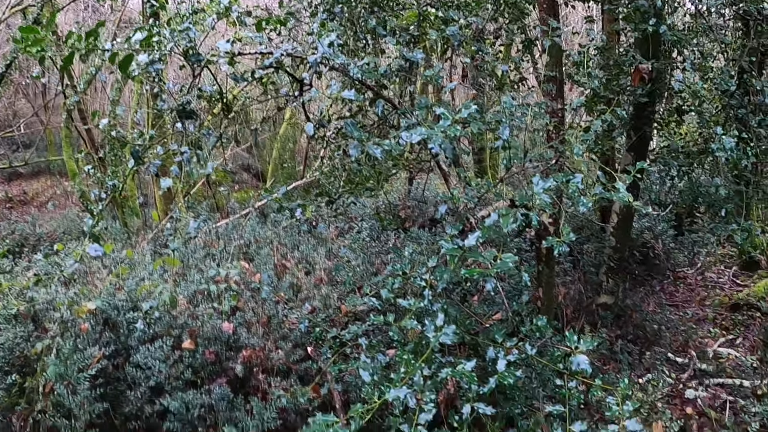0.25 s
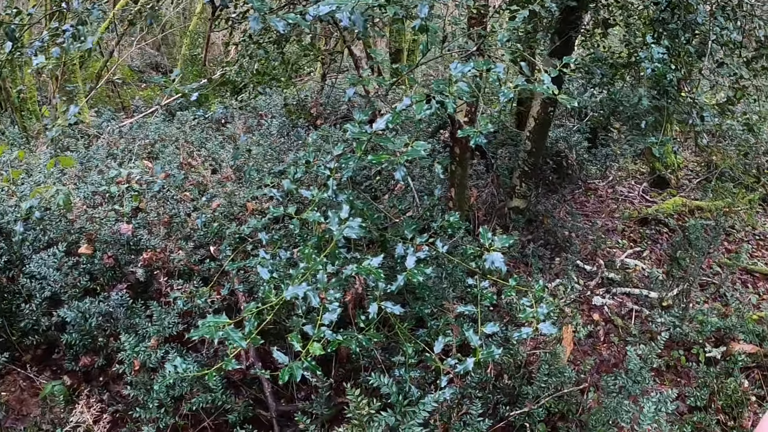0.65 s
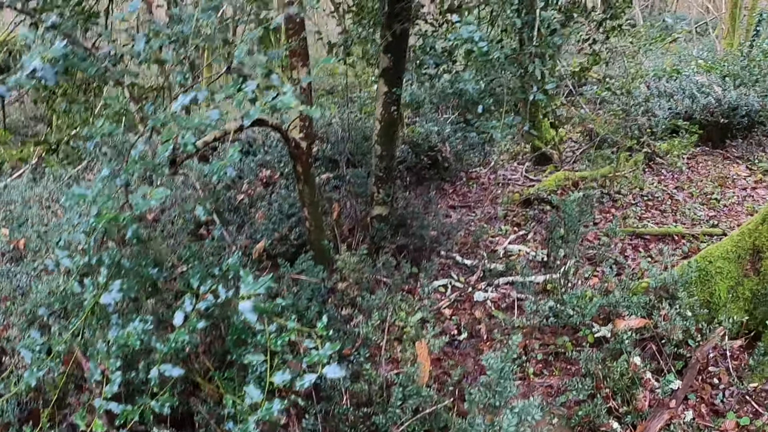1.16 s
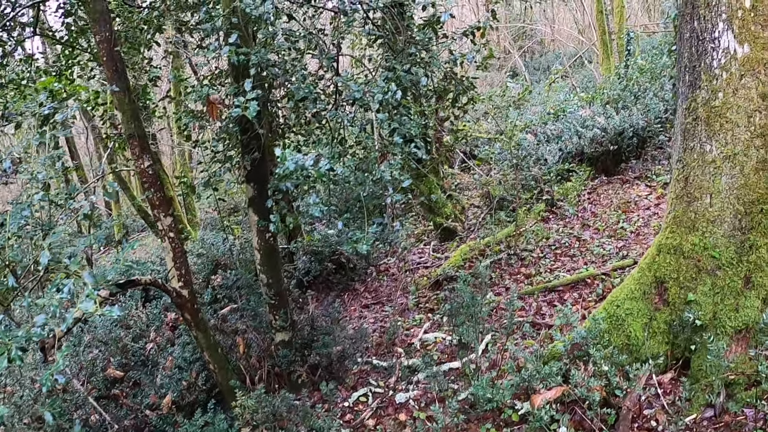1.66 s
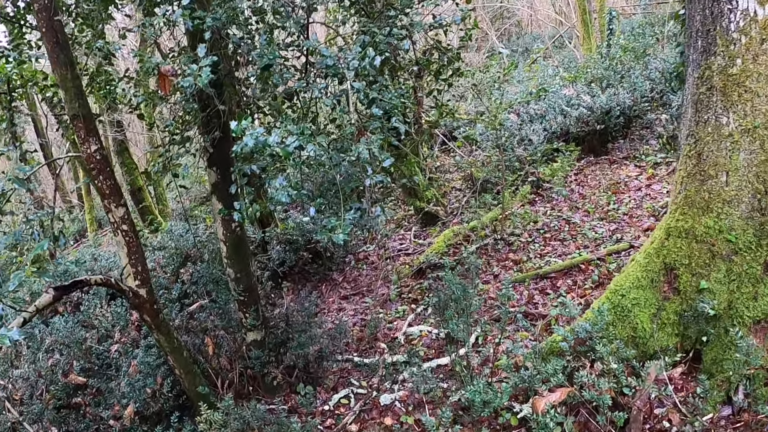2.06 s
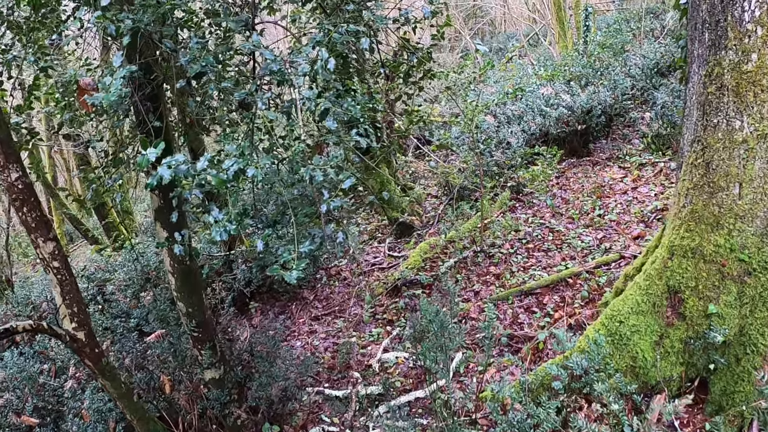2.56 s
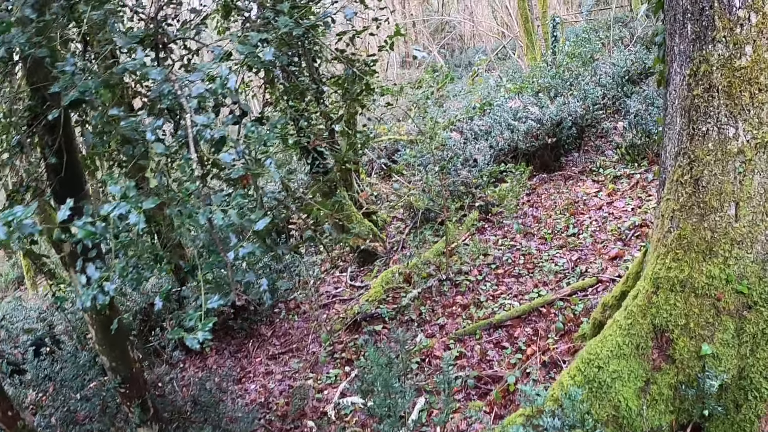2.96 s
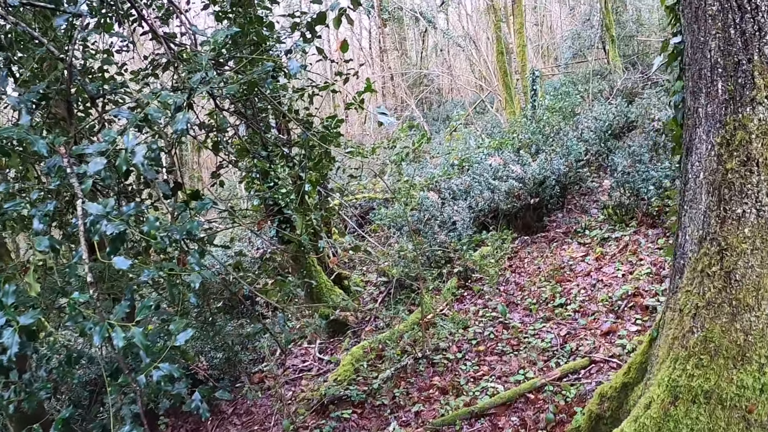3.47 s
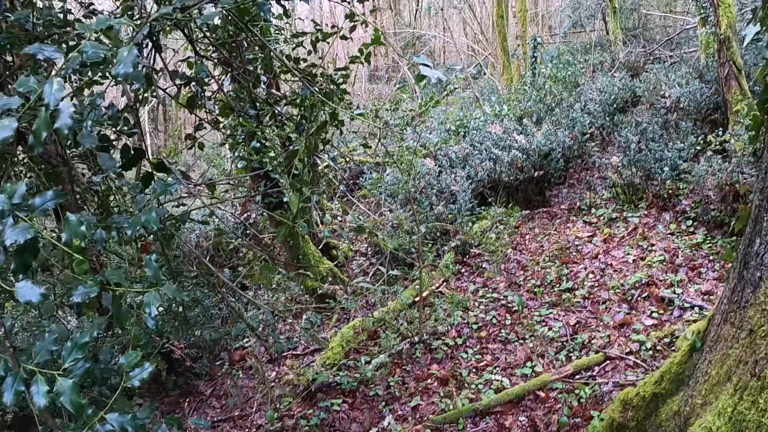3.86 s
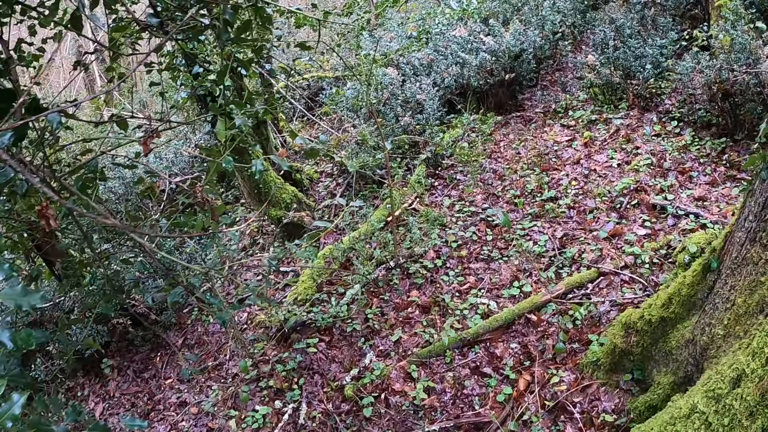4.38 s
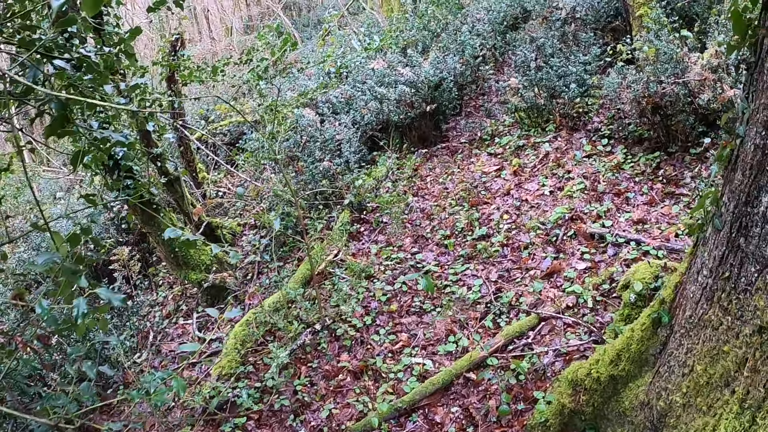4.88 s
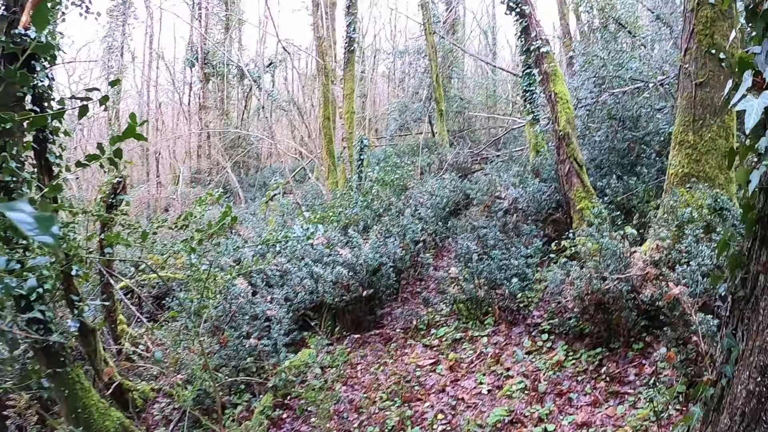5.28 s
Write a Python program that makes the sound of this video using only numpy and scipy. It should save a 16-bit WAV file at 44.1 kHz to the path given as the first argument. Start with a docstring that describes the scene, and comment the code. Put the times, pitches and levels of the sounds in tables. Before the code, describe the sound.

A dog wearing a small sheet-metal bell trots unseen through woodland brush. The bell gives short, hollow, slightly dull clanks near 1.3 kHz, with thin metallic overtones, a tick and a brief noisy clash, in uneven bursts of roughly ten or more strikes a second. From 0 to 1.2 s they are modest and clearly left, with one stronger clink at 0.2 s and light leaf crackle and twig ticks. Between about 1.25 and 1.65 s a heavy low wind buffet thuds and flutters on the microphones. From 1.65 s clanks grow denser and louder, drifting towards centre; a sharp twig snap comes at 2.7 s, and strong strikes with crunching leaves around 3.1 s. Loud separate clanks follow at 4.15 and 4.6 s, slightly right by 4.8 s, then back left by 5.2 s, with high twig snaps near 5.4 s. Small wind puffs, short tree echoes and steady soft hush throughout; it stops mid-action at 5.5 s.

```python
"""Dog bell in the brush

A dog with a small sheet-metal bell on its collar trots through woodland brush, from left to right and back.
The clapper strikes unevenly and sets off ringing modes, a noisy clash and a tick; trees echo them.
Leaves rustle as crackling noise and twigs snap as short damped tones. Wind buffets the two microphone
ports as slow noise swings, over a steady hush of filtered noise."""
import sys
import numpy as np
from scipy import signal
from scipy.io import wavfile
from scipy.ndimage import uniform_filter1d, map_coordinates

SR = 44100
rng = np.random.default_rng(int(sys.argv[2]) if len(sys.argv) > 2 else 0)


def output_pcm(signal):
    """Save a mono or channel-first signal as 16-bit PCM at the path in sys.argv[1].

    Samples are clipped to [-1, 1] before scaling.
    """
    pcm = np.clip(np.atleast_2d(signal).T, -1, 1) * 32767
    wavfile.write(sys.argv[1], SR, np.round(pcm).astype(np.int16))


N = 243954  # length in samples

# Where the dog is heard. Each row: time in seconds, left level over right level in dB (for the bell's hum).
PATH = [(0, 11), (.5, 12.5), (1.3, 8), (2.1, 4), (2.6, 4.5), (3.1, 0), (4.1, 0), (4.85, -3), (5.2, 4),
        (5.53, 4)]


def amp(db):
    """Turns decibels into a gain."""
    return 10 ** (np.asarray(db) / 20)


def evened(x):
    """Scales a signal to an rms (average strength) of 1."""
    return x / np.sqrt(np.mean(x ** 2) + 1e-20)


def read(points, hz):
    """Reads a table of (Hz, value) between its points, on a log-frequency axis."""
    f, value = np.transpose(points)
    return np.interp(np.log(hz + 1), np.log(f + 1), value)


def curves(rows):
    """Draws each column of a time table as a curve with a value at every sample."""
    s, *columns = np.transpose(rows)
    return [np.interp(np.arange(N) / SR, s, column) for column in columns]


def add(mix, s, sound):
    """Mixes a sound in at time s."""
    part = mix[..., max(round(s * SR), 0):][..., :sound.shape[-1]]
    part += sound[..., :part.shape[-1]]


def panned(pan_db):
    """Gives the left and right gains; a positive balance is louder on the left."""
    return amp(np.array([pan_db / 2, -pan_db / 2]))


def band(x, lo_hz, hi_hz):
    """Keeps the range between two frequencies."""
    return signal.sosfilt(signal.butter(2, [lo_hz, hi_hz], "band", fs=SR, output="sos"), x)


def swell(s, length, rise):
    """Gain that climbs to 1 at time s and dies away, in straight lines in dB."""
    edge_db = 14  # how far down both ends of the length lie
    t = np.arange(N) / SR - s
    rise = np.clip(rise, .05, .95)  # share of the length spent rising
    away = np.where(t < 0, -t / rise, t / (1 - rise))
    return amp(-edge_db * away / max(length, .01))


def hiss(spectrum, patchy_db, size=512):
    """Stereo noise shaped by a spectrum table, with patches of loudness that drift in time and pitch."""
    # How alike left and right are. Each row: frequency in Hz, likeness from 0 to 1.
    likeness = [(100, .2), (300, 0.87), (700, 0.97), (2000, 0.55), (5000, 0.088), (10000, 0.067)]
    frames, hz = 4 * N // size + 5, np.fft.rfftfreq(size, 1 / SR)
    a, b, c, d, patches = rng.standard_normal((frames, len(hz), 5)).T
    patches = uniform_filter1d(patches, size=6, axis=0)
    patches = evened(uniform_filter1d(patches, size=10, axis=1))
    same = np.clip(read(likeness, hz), -1, 1)[:, None]
    left = a + 1j * b
    right = same * left + np.sqrt(1 - same ** 2) * (c + 1j * d)
    both = np.array([left, right]) * amp(read(spectrum, hz)[:, None] + patchy_db * patches)
    return signal.istft(both, nperseg=size, noverlap=3 * size // 4)[1][:, :N]


def air():
    """The steady hush of the wood: soft noise with a fixed spectrum."""
    # Tone color of the hush. Each row: frequency in Hz, relative level in dB per Hz.
    hush_color = [(20, 8), (50, -10), (100, -41), (160, 2), (250, 7.5), (500, 6.5), (800, -8), (2000, 2.5),
                  (4000, 1), (6000, 5), (10000, -37), (13000, -36), (15500, -41)]
    hush = hiss(hush_color, patchy_db=-0.5, size=1024)
    return amp(-67.5) * hush / np.std(band(hush, 1500, 2600))  # the level is set in this band


def wind():
    """Lumpy pressure swings, mostly unrelated at the two ports; stronger gusts swing faster."""
    # One long gust. Each row: time in seconds, level in dB, flutter level above that in dB,
    # left level over right level in dB.
    gust = [(1.0, -70, 2, -2), (1.14, -59, -24, 5), (1.19, -33, -33, 4), (1.24, -52, -23, -1),
            (1.255, -42, -12, 12), (1.27, -12.5, -9, 1.5), (1.32, -27.5, -0.5, 0), (1.43, -26.5, -5, -5.5),
            (1.54, -24.5, -39, 8), (1.62, -33.5, -32, -8.5), (1.77, -63, -19, -12), (1.9, -90, -12, 0)]
    # Short puffs. Each row: time of the peak in seconds, length in seconds, level in dB,
    # flutter level above that in dB, left level over right level in dB.
    short_puffs = [(0.053, 0.083, -74, 5, -1), (0.512, 0.085, -79, -1.5, 3), (0.651, 0.098, -85, -2, -5),
                   (2.02, .3, -59.5, -1, 0), (2.337, 0.15, -59, -18, 1), (2.69, .12, -71, -8, -13),
                   (2.914, 0.092, -54, -13, 1.5), (3.086, 0.12, -51, 1, -1), (3.195, .1, -60, -8, 6),
                   (3.279, 0.092, -36, -24, 6), (3.665, .3, -56.5, -8.5, -5), (3.93, 0.13, -63, -24, -3),
                   (4.056, 0.58, -62, -17, 1), (4.662, 0.15, -41.5, -10, -0.5),
                   (4.824, 0.034, -46, -25, 1.5), (4.93, 0.086, -52, -19, 1.5), (5.224, 0.23, -50, -9, -3),
                   (5.44, 0.069, -53, -24, -3), (5.53, 0.093, -61, 2, -7)]
    puff_rise = 0.58  # share of the length spent rising
    quick_share = 0.29  # of the strongest gusts' power in the quicker swings, before they are flattened
    calm_flutter_db = -73  # the air is never quite still

    level_db, flutter_db, pan_db = curves(gust)
    level = amp(level_db) * panned(pan_db)
    fast = level * amp(flutter_db)
    for s, length, db, fast_db, side_db in short_puffs:
        puff = amp(db) * panned(side_db)[:, None] * swell(s, length, puff_rise)
        level, fast = level + puff, fast + puff * amp(fast_db)

    raw = rng.standard_normal((3, N))
    raw = raw[:2] + 0.39 * raw[2]  # the third noise is common to both ports
    lumps = amp(6.4 * evened(band(rng.standard_normal(N), 15.4, 39.6)))
    strong = np.clip((20 * np.log10(level.mean(0)) + 63) / 18, 0, 1)  # 0 in a calm, 1 in a strong gust
    slow = evened(band(band(raw, 27.6, 59.3), 28.7, 61))
    quick = evened(band(raw, 52, 102))
    murmur = evened(band(band(raw, 144, 227), 130, 470))
    flutter = evened(murmur * lumps)
    push = np.sqrt(1 - quick_share * strong) * slow + np.sqrt(quick_share * strong) * quick
    push = 1.6 * np.tanh(.8 * push)  # flattens the peaks: swings of even height with steep edges
    return level * push + fast * flutter + amp(calm_flutter_db) * murmur


def leaves():
    """Dry leaves crackle and litter crunches: noise whose loudness jumps with small random cracks."""
    # Steady rustle. Each row: time in seconds, fizz level in dB, low crunch above that in dB
    # (all before the mixing gains at the end).
    rustle = [(0, -61.5, -9), (.3, -58.5, -25), (.8, -57.5, -22), (1.0, -54.5, -1), (1.22, -58.5, -18),
              (1.5, -50.5, 5.5), (1.8, -58, 0), (2.0, -52, 13.5), (2.25, -51.5, 4), (2.5, -57.5, 3),
              (2.9, -54.5, -2), (3.3, -49.5, 10.5), (3.65, -50.5, 6.5), (3.9, -53.5, 6.5), (4.3, -56, 8),
              (4.75, -54.5, 13.5), (5.1, -52.5, 9), (5.53, -50, 9.5)]
    # Treads and shoves. Each row: time of the peak in seconds, length in seconds, fizz level in dB,
    # low crunch above that in dB (before the same gains).
    treads = [(.01, 0.024, -50.5, 7.5), (0.61, 0.1, -50.5, 19), (0.645, .08, -43.5, -12),
              (1.915, .1, -49, 10), (2.06, 0.062, -47, -5), (2.37, 0.081, -48, 0),
              (2.717, 0.14, -44.5, -21), (3.053, 0.1, -39, 8.5), (3.113, 0.1, -42.5, -14),
              (3.436, 0.036, -37.5, 8), (3.721, 0.06, -41, -8), (4.164, 0.079, -47, -12),
              (4.494, 0.65, -49, 13.5), (4.628, 0.19, -45, 7), (5.071, 0.065, -42, 8.5),
              (5.25, 0.13, -43.5, 9.5), (5.404, 0.064, -58, -9)]
    # Dry leaves. Each row: frequency in Hz, relative level in dB per Hz.
    fizz_color = [(500, -111), (900, 8.5), (1700, 7), (2500, 2.5), (4000, 2.5), (6000, -4), (10000, -11),
                  (13500, -28), (15500, -40)]
    # Litter pressed down. Each row: frequency in Hz, relative level in dB per Hz.
    crunch_color = [(90, -50), (150, 0), (250, 1.5), (600, 6.5), (900, -0.5), (1400, -27.5)]
    tread_rise = 0.7  # share of the length spent rising
    brush_pan = 0.19  # share of the hum's left-right balance

    level_db, crunch_db = curves(rustle)
    dry_power, low_power = amp(2 * level_db), amp(2 * (level_db + crunch_db))
    for s, length, db, low_db in treads:
        power = (amp(db) * swell(s, length, tread_rise)) ** 2
        dry_power = dry_power + power
        low_power = low_power + power * amp(2 * low_db)

    crack_sizes = amp(3.1 * np.minimum(rng.exponential(1, N), 5))
    cracks = crack_sizes * (rng.random(N) < 700 / SR)  # about 700 a second
    grain = evened(.9 + evened(signal.lfilter([1], [1, -.99], cracks)))  # each crack dies away quickly
    fizz = hiss(fizz_color, patchy_db=1.5, size=256)
    fizz /= np.std(band(fizz, 3400, 5200))
    crunch = evened(hiss(crunch_color, patchy_db=4.5))
    fizz_part = amp(-4.5) * np.sqrt(dry_power) * fizz * grain
    crunch_part = amp(-6.0) * np.sqrt(low_power) * crunch * (0.37 + 0.13 * grain)
    return panned(brush_pan * curves(PATH)[0]) * (fizz_part + crunch_part)


def twigs():
    """Each snap is a few damped cycles of a tone with a dull puff of noise."""
    # Twig snaps. Each row: start in seconds, strength in dB before the fades, pitch in Hz,
    # left level over right level in dB.
    snaps = [(0.042, -34.5, 740, 2), (0.197, -32.5, 2250, -2), (.571, -32, 620, -3), (.620, -29, 1980, 4),
             (2.041, -27.5, 2120, 4), (2.141, -36, 530, -1), (2.250, -37, 570, 1), (2.698, -20, 1970, -3),
             (2.705, -28, 2200, 15), (2.803, -30, 4500, -2), (2.990, -28.5, 3070, -7),
             (3.049, -26, 2160, -10), (3.083, -35, 2490, 6), (3.129, -32.5, 493, -2),
             (4.432, -29.5, 1920, 1), (4.566, -24, 4050, -1), (5.383, -22, 5000, 0), (5.4, -24.5, 4080, 5)]
    out, t = np.zeros((2, N)), np.arange(600) / SR
    puffs = band(rng.standard_normal((len(snaps), 600)), 540, 4300)
    for (s, db, hz, pan_db), puff in zip(snaps, puffs):
        tone = np.sin(2 * np.pi * hz * t) * np.exp(-t * hz / 1.66)  # high pitches die sooner
        snap = tone + 0.73 * puff * np.exp(-t / 0.0047)
        onset = 1 - np.exp(-t / 0.00031)
        add(out, s, amp(db) * panned(pan_db)[:, None] * snap * onset)
    return out


def bell():
    """Each strike rings all modes (the metal's own tones); the place of the blow sets each family's share."""
    # Clapper strikes. Each row: time in seconds, upper hum level in dB, then levels above that in dB of the
    # lower hum, third mode, fourth mode, 5.5 kHz pair and treble modes, and last the upper hum's time to
    # fall 60 dB in seconds (at least 0.03 is used), short when fur touches the bell.
    strikes = [(.0024, -37.5, -4, -26, -16, -14, -22, 0.075), (0.0426, -29, -1.5, -19, -15, -23, -10, 0.2),
               (0.0794, -28, -3, -52, -33, -13.5, -18.5, 0.1),
               (0.2184, -15.5, -15, -23, -24, -21.5, -25, 0.19),
               (.374, -28, -0.5, -24, -25.5, -14.5, -14.5, 0.09),
               (0.4265, -42, 1, -17, -19, 3.2, -22, 0.27), (0.5938, -32, -1.5, -18, -11, -16, -16, 0.1),
               (0.6417, -17, -12, -33.5, -26, -27.5, -27, 0.11),
               (0.6883, -28, -2.5, -39, -14, -27, -16.5, 0.07),
               (.7372, -28, 0, -29, -18.5, -25, -25, 0.073), (0.83, -27.5, -30, -24, -29, -17, -20, 0.075),
               (0.9618, -36, -14, -22, -21, -12, -18.5, 0.13),
               (1.0171, -25, -7.5, -15.5, -25.5, -19, -23, 0.16),
               (1.1214, -31, -28, -42, -46, -19.5, -24, .11), (1.277, -25.5, 1, -24, -28, -12.5, -17, 0.16),
               (1.3837, -33.5, 3.5, -19.5, -26, -22, -21, .11),
               (1.6309, -20.5, -27, -36, -35, -21, -31, 0.043),
               (1.6646, -20.5, -24, -53, -38, -23, -32, 0.13),
               (1.7067, -17, -9, -30, -39, -23.5, -29.5, 0.1), (1.7891, -41, -3, -16, -47, -7, -2, 0.14),
               (1.8952, -15, -4, -27, -32.5, -29, -34, 0.14),
               (1.9363, -17.5, -14.5, -59, -52, -21.5, -24, 0.22),
               (2.0465, -17, -33, -11.5, -29, -18, -24, 0.079),
               (2.2121, -15, -13, -27, -34, -32.5, -34, 0.092),
               (2.2618, -21.5, 0, -62, -62, -34, -30, 0.024),
               (2.3565, -14.5, -16, -19.5, -24.5, -20.5, -26, 0.093),
               (2.3675, -14, -11, -28, -58, -26, -24.5, 0.15), (2.4354, -33, -2, -33, -36, -8.5, -20, 0.1),
               (2.5346, -23.5, -11, -27, -27, -25, -38, 0.095),
               (2.597, -19.5, -7, -13.5, -28, -23.5, -30.5, 0.19),
               (2.6708, -15, -2.5, -28, -56, -22, -32, 0.084),
               (2.6815, -6.5, -22, -33, -31.5, -19.5, -33.5, 0.059),
               (2.723, -38.5, 5, -25, -19, -21, -0.5, 0.66),
               (2.827, -14, -9.5, -37, -24.5, -28.5, -34, 0.08),
               (2.8704, -34, 3.5, -25, -6, -17, -15.5, 0.27), (2.97, -22, 3, -22.5, -26, -22.5, -26, 0.05),
               (3.047, -8.5, -19, -42, -50, -44, -44, 0.07),
               (3.108, -1.5, -15.5, -36, -38, -29.5, -35, 0.081),
               (3.19, -30.5, -10, -15, -22, -4, -11.5, 0.16), (3.239, -26, -22, -29, -33, -15, -25, 0.079),
               (3.2712, -10.5, -18, -34, -31, -29, -31, 0.14), (3.299, -12, -13, -29, -43, -24.5, -24, .14),
               (3.4232, -8.5, -5.5, -34, -32, -32, -21, 0.082), (3.5179, -40, -2, -33, -37, -22, -5, 1),
               (3.5834, -22.5, 9, -18, -18.5, -13, -16, 0.24),
               (3.7167, -17.5, 5.5, -19.5, -12, -14, -20.5, 0.17),
               (3.76, -21.5, -19, -10, -30, -39, -24, 0.19),
               (3.8394, -16.5, -24, -33, -50, -33, -33, 0.058),
               (3.9795, -17, -4, -3, -25.5, -10.5, -17.5, 0.23),
               (4.1583, -5.5, -19, -28.5, -28, -32.5, -36, 0.12),
               (4.1973, -27, 1, -58, -36, -30, -36, 0.089), (4.2665, -12.5, -36, -40, -54, -44, -41, 0.1),
               (4.3017, -24, 1, -26, -39, -24, -38, 0.034), (4.3839, -28, -11, -26, -35, -29, -20.5, 0.1),
               (4.4709, -9, -15, -38, -36, -31.5, -33, 0.18),
               (4.5136, -19.5, -28, -24.5, -33, -36, -22.5, 0.16),
               (4.6199, -3, -45, -33.5, -35.5, -45, -32.5, 0.066),
               (4.835, -20.5, 3.5, -43, -50, -33, -29.5, 0.062), (4.88, -32, -4, -33, -36, -24, -9, 0.13),
               (4.8983, -23.5, -26, -24, -38, -37, -22, 0.086), (4.9752, -45, 1, -17, -20, -17, -2, 0.23),
               (5.0508, -30.5, -10, -1, -16, 3, 1.5, 0.29), (5.0594, -16, -15, -20.5, -27, -39, -29, 0.093),
               (5.2294, -7.5, -7, -23, -35, -20.5, -25, 0.079),
               (5.264, -15.5, -7, -19.5, -27, -30, -32, 0.073),
               (5.3149, -18, 2, -28, -27, -22, -17.5, 0.079),
               (5.3974, -29.5, -12, -54, -36, -30, -18, 0.085), (5.4886, -27, -2, -46, -37, -33, -20, 0.72),
               (5.5032, -14, -5.5, -51.5, -38.5, -43, -45, 0.052)]
    # Upper modes, one list a family. Each row: frequency in Hz, level within its family in dB,
    # time to fall 60 dB in seconds (before a factor of 0.96).
    upper_modes = [
        [(2860, 0, .5)],
        [(3133, 0, .45), (4190, -16, .2)],
        [(5450, -3, .42), (5691, -3, .35)],
        [(5923, -2, .26), (6215, -6, .24), (6290, -7, .24), (6580, -15, .2), (6880, -14, .2)],
        [(7210, -8, .24), (7270, -6, .22), (7531, -5, .22), (7800, -13, .2), (8030, -9, .26), (8625, -10, .26),
         (8835, -10, .26), (9212, -9, .28)],
        [(10390, -3, .21), (10700, -7, .19), (11050, -4, .21), (11480, -5, .21), (11680, -6, .19),
         (12050, -6, .19), (12460, -6, .19), (12930, -6, .19), (13200, -5, .17)],
    ]
    # The lowest mode is split in two and beats: upper and lower hum in Hz.
    hum_pair = [1292, 1241]
    # Running speed shifts the pitch. Each row: time in seconds, heard pitch of the third mode in Hz.
    heard_pitch = [(0, 2862), (.4, 2868), (.8, 2856), (1.1, 2854), (1.6, 2853), (2.1, 2852), (2.6, 2858),
                   (3.2, 2865), (3.6, 2860), (4.0, 2863), (4.3, 2865), (4.7, 2848), (5.1, 2843),
                   (5.3, 2852), (5.53, 2851)]
    # Noisy clash of a blow. Each row: frequency in Hz, relative level in dB per Hz.
    clash_color = [(2000, -7), (4500, 10), (6500, -18), (9000, 1), (11000, -10), (13500, -53), (15500, -26)]
    # The 6 kHz, 8 kHz and top families share one treble level: offsets from it in dB.
    treble_offsets = [-1, 0.5, -11]
    # Depth of the swinging lobes (a ratio): hum, middle modes, treble modes.
    sway_depths = [0.28, 0.8, 1.1]
    tick_db, tick_per_db = -33.5, 0.5  # the clapper's tick grows more slowly than the hum
    middle_pan_share, treble_pan_share = 1.78, 0.26  # of the hum's left-right balance
    lower_ring = 1.46  # the lower hum outlasts the upper by this factor

    family = np.repeat(np.arange(8), [1, 1, *map(len, upper_modes)])
    hz, db, t60 = np.transpose([(f, 0, 1) for f in hum_pair] + sum(upper_modes, []))
    hum = family < 2
    travel = np.cumsum(curves(heard_pitch)[0] / hz[2]) / SR  # time as it passes at the moving bell
    step = 16  # the envelopes are worked out at every 16th sample
    t = np.arange(1400) * step / SR
    rings = np.zeros((len(hz), N // step + 1), complex)
    clash, tick = np.zeros((2, N // step + 1))
    rise_s = np.where(hum, .003, .0015)[:, None]
    chance = rng.standard_normal((len(strikes), 2 * len(hz)))
    for (s, hum_db, *lower_db, treble_db, hum_t60), draw in zip(strikes, chance):
        at = max(round((s - .0025) * SR / step), 0)
        u = t[:len(clash) - at]
        now = slice(at, at + len(u))
        rest_db = [*lower_db, *(treble_db + np.array(treble_offsets))]
        level_db = hum_db + np.array([0, *rest_db])[family] + db
        level_db = level_db + 2.94 * draw[:len(hz)] * (family > 3)  # the high modes vary by chance
        # a blow starts the modes nearly together
        start = np.exp(.3j * draw[len(hz):] - 2j * np.pi * hz * travel[at * step])
        decay = np.where(hum, max(hum_t60, .03) * lower_ring ** family, 0.96 * t60)
        rise = 1 - np.exp(-u / rise_s)
        rise[:2] **= 2  # the hum swells softly
        rings[:2, now] *= 1 - 0.67 * rise[0]  # the landing clapper stills the old hum
        rings[:, now] += start[:, None] * rise * amp(level_db[:, None] - 60 * u / decay[:, None])
        clash[now] += amp(hum_db + rest_db[-1] - 6 - 60 * u / .17)
        tick[now] += amp(tick_per_db * hum_db + tick_db - 60 * u / .014)

    # between blows the clapper scrapes the wall and keeps the hum alive
    scrape = uniform_filter1d(rng.standard_normal((4, len(clash))), size=60, axis=1)
    rings[:2] += amp(-55.5) * (evened(scrape[:2]) + 1j * evened(scrape[2:]))

    hum_pan, middle_pan, treble_pan = np.outer([1, middle_pan_share, treble_pan_share], curves(PATH)[0])
    fine, coarse = np.arange(N) / step, np.arange(len(clash))
    clash_noise = evened(hiss(clash_color, patchy_db=8.0, size=256))
    out = clash_noise * np.interp(fine, coarse, clash) * panned(treble_pan)
    tick_noise = evened(band(rng.standard_normal(N), 1500, 6000))
    out += tick_noise * np.interp(fine, coarse, tick) * panned(middle_pan)
    for f, k, ring in zip(hz, family, rings):
        # the bell swings: lobes of the mode sweep past each port, faster and deeper the higher the mode
        span = [60, 60, 56, 56, 30, 16, 12, 8][k]  # smoothing in envelope steps
        sway = uniform_filter1d(rng.standard_normal((6, len(ring))), span)
        sway = evened(uniform_filter1d(sway, span))
        depth = sway_depths[(k > 1) + (k > 3)]
        apart = np.clip(0.42 + f / 10000, 0, 1)  # how differently the two ports hear the lobes
        shared = np.sqrt(1 - apart ** 2) * (sway[0] + 1j * sway[1])
        separate = apart * (sway[2:4] + 1j * sway[4:])
        lobes = 1 + depth * (shared + separate)
        lobes /= np.sqrt(1 + 2 * depth ** 2)
        turn = np.exp(2j * np.pi * f * travel)
        pan_db = hum_pan if k < 2 else middle_pan if k < 4 else treble_pan
        out += panned(pan_db) * [(np.interp(fine, coarse, ring * lobe) * turn).imag for lobe in lobes]
    return out


def ports(x):
    """The sound reaches the right port slightly first: the left is delayed by 2.2 samples."""
    return np.array([map_coordinates(x[0], [np.arange(N) - 2.2], order=3), x[1]])


def trees(x):
    """Sparse echoes of random sign from ground and trunks, each band dying at its own speed."""
    # How long the scatter lasts. Each row: frequency in Hz, time to fall 60 dB in seconds.
    scatter = [(500, 0.13), (1300, 0.28), (3000, 0.17), (6000, 0.38), (12000, 0.35)]
    taps = np.zeros((2, SR // 2))
    at = np.arange(200, SR // 2 - 40, 40)
    at = at + rng.integers(0, 40, (2, len(at)))
    np.put_along_axis(taps, at, rng.choice([-1., 1.], at.shape), 1)
    taps[1] = 0.38 * taps[0] + 1.38 * taps[1]  # the ports lie close, so they share some echoes
    hz, t, z = signal.stft(taps, SR, nperseg=256)
    fading = z * amp(-60 * t / read(scatter, hz)[:, None])
    tail = signal.istft(fading, SR, nperseg=256)[1]
    return signal.fftconvolve(x[None], tail / np.linalg.norm(tail[0]), axes=1)[:, :N]


def scene():
    """Mixes the bell, its echoes, brush, wind and hush."""
    ring = bell()
    echoes = amp(-10.0) * trees(ring.mean(0))
    return ports(ring) + echoes + leaves() + twigs() + wind() + air()


def record(dry):
    """Limits the treble: a steep filter removes what lies above about 15.5 kHz."""
    low_pass = signal.firwin(1023, 15550, window=("kaiser", 9), fs=SR)
    return signal.oaconvolve(dry, low_pass[None], "same")


dry = scene()
out = record(dry)
output_pcm(out)
```